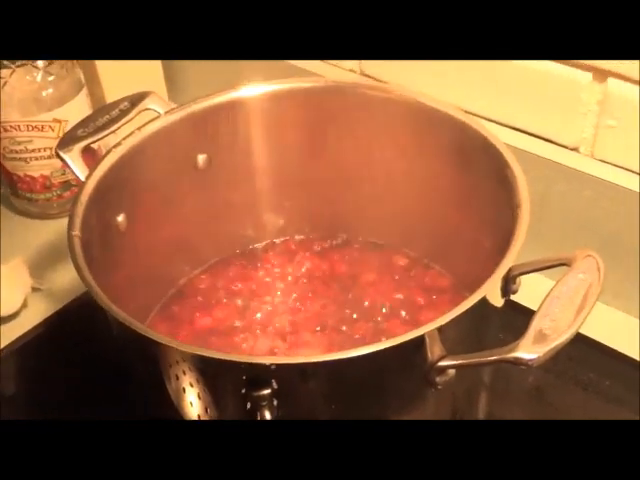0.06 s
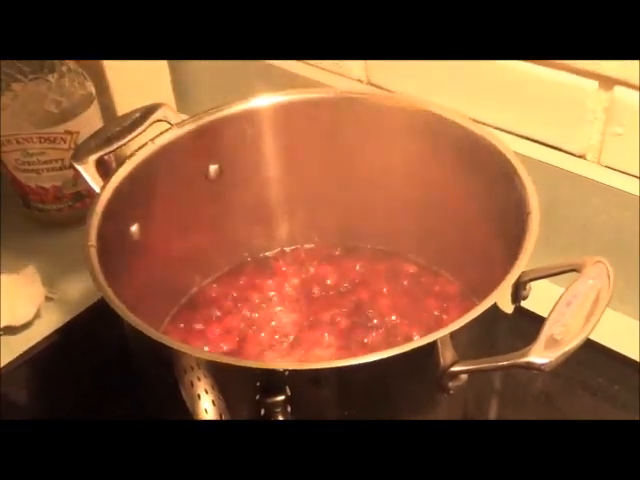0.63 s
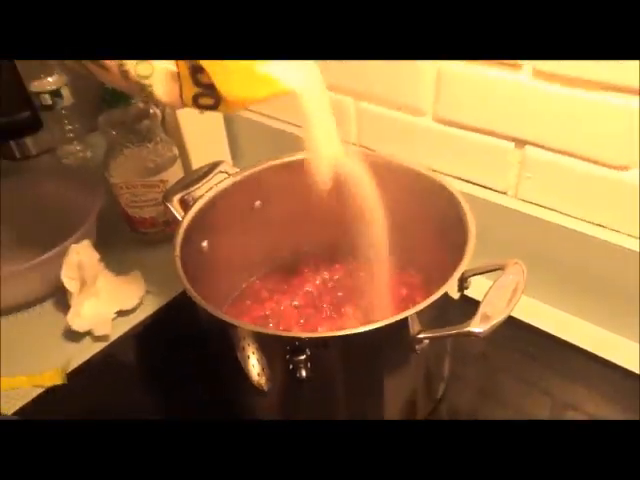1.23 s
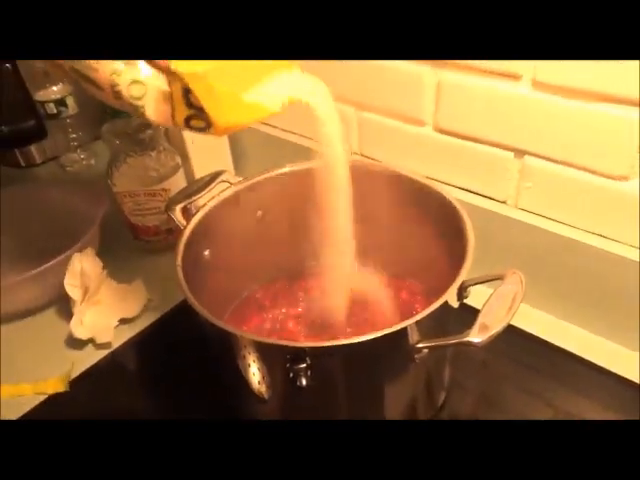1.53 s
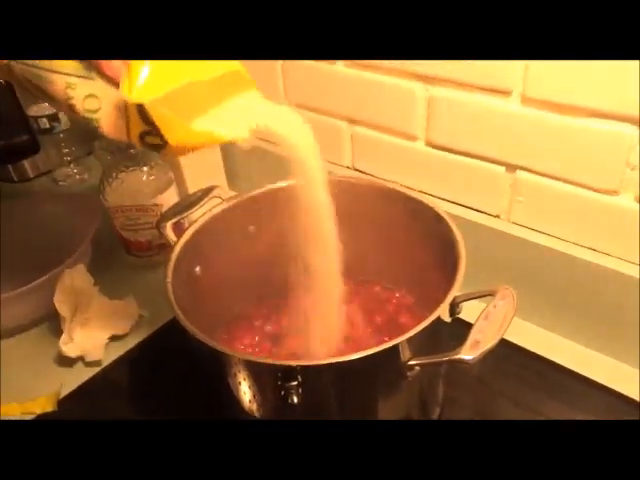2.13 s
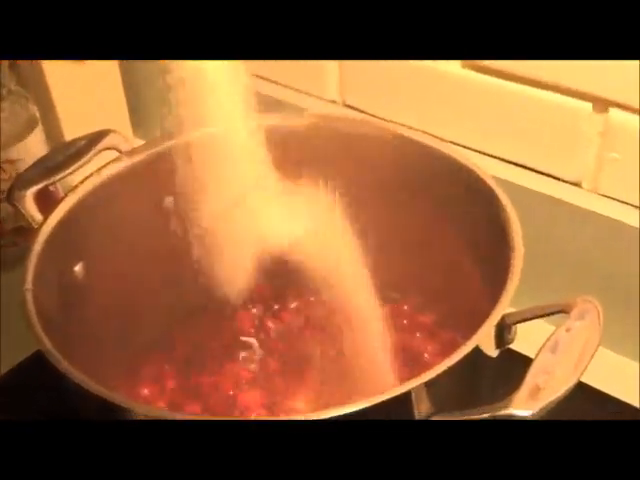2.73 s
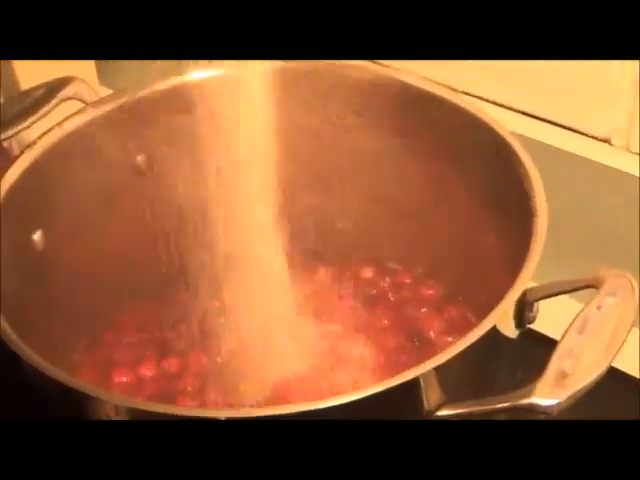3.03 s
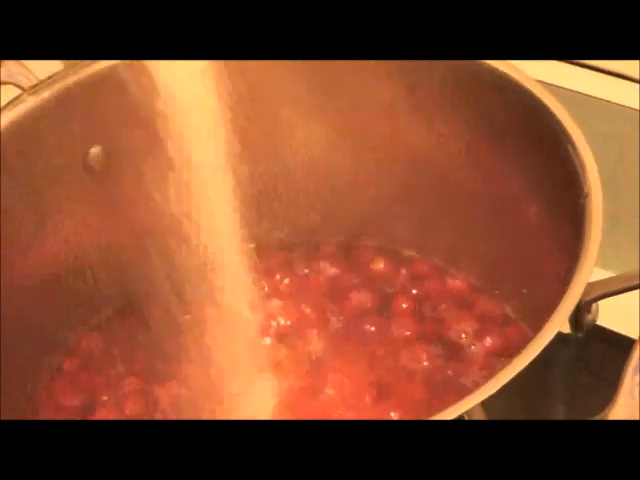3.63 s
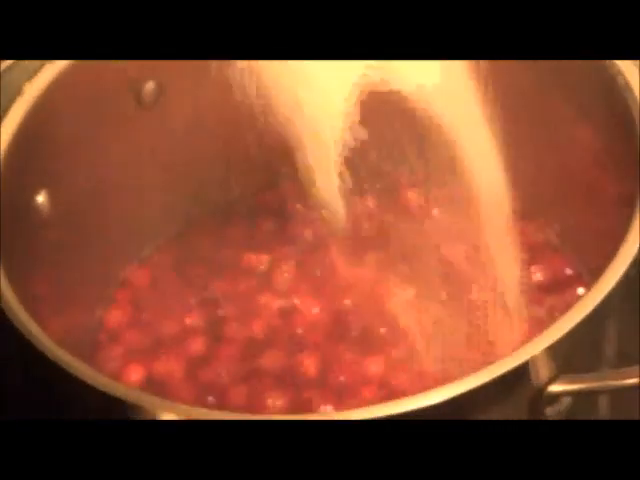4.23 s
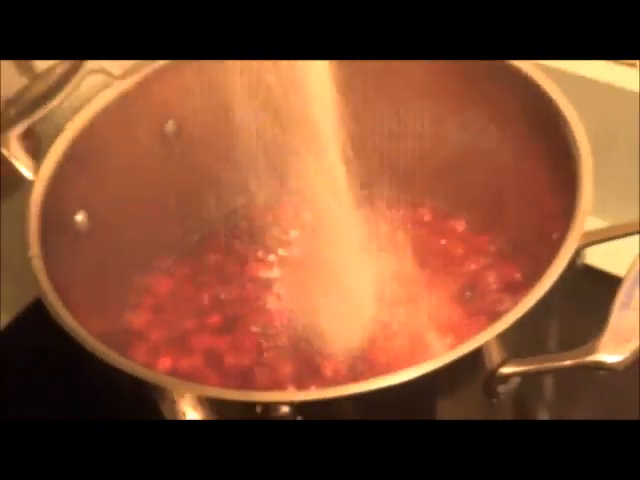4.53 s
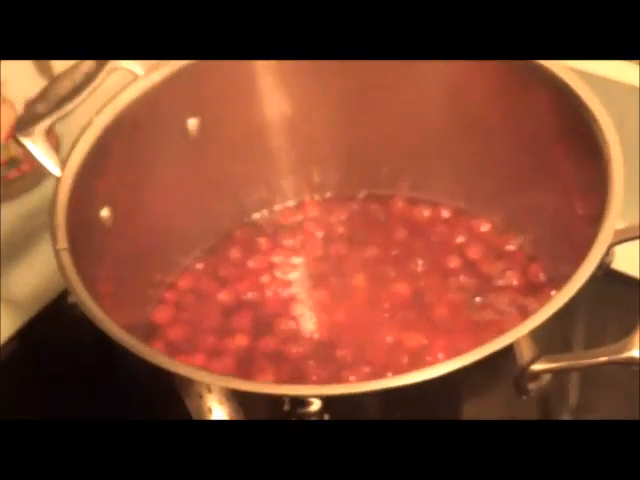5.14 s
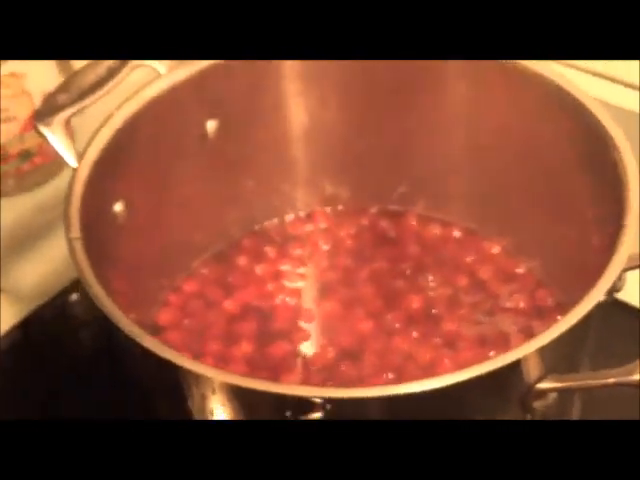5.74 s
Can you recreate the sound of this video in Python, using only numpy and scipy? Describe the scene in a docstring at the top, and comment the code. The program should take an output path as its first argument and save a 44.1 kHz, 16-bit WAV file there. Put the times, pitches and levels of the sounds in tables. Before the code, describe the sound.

A thin, bright hiss of sugar falls into a steel pot of softly simmering berry sauce, heard close in stereo with very little kitchen echo. In the first 0.6 seconds several berries pop sharply, with a couple of tiny ticks. From about 0.7 seconds the sugar comes in quick surges, around seven a second: fine crystals hiss, coarse grains patter, and each surge drops a clump that splashes, thuds softly and faintly clangs the pot. A hard lump ticks against the steel near 2 seconds. The pour grows and is strongest from about 3.3 to 4.7 seconds, with quiet bubbling and a light metallic ring underneath. The last clump lands near 4.9 seconds, and the stream thins to a smooth hiss with two small spills of grains, swelling slightly around 5.5 seconds. A few ticks follow at 5.7 to 5.8 seconds, then one last small pop.

```python
"""A thin hiss of sugar and a few berries popping, close over a steel pot of sauce in a small kitchen.
The sugar pours from a paper bag in surges, about seven a second: fine crystals hiss, coarse ones patter,
and each surge drops a clump that splashes, thuds softly and clangs the pot. Underneath, the berry sauce
simmers and the steel rings. The stream thins to a smooth hiss, ending on a few ticks and one last pop.
Stereo microphone, near enough that almost all the sound comes straight from the pot."""
import sys
import numpy as np
from scipy import signal
from scipy.fft import rfft, irfft, next_fast_len
from scipy.io import wavfile
from scipy.ndimage import uniform_filter1d

SR = 44100
rng = np.random.default_rng(int(sys.argv[2]) if len(sys.argv) > 2 else 0)


def store_pcm(level_fs):
    """Save levels as 16-bit WAV."""
    pcm = np.round(np.clip(level_fs, -1, 1) * 32767).astype(np.int16)
    wavfile.write(sys.argv[1], SR, np.atleast_2d(pcm).T)


N = 258867
T = np.arange(N) / SR

# the thin stream that never stops: t/s, level/dB
TRICKLE_LEVEL = [(0, -39), (.68, -35.5), (2, -36), (3, -34), (4.4, -35), (4.82, -62), (4.89, -38.5),
                 (5.0, -37), (5.75, -36.5), (5.83, -45)]
# loose sugar sliding out as the bag tips: peak t/s, level/dB, rise/s, fall/s
SUGAR_SLIDES = [(.17, -30, 0.29, 0.17), (0.533, -31.5, 0.12, 0.043), (5.17, -31.5, 0.14, .1),
                (5.48, -26.5, 0.28, 0.17)]
# each shake of the bag, a surge with a clump in it: landing t/s, surge/dB, surge lead/s, splash/dB, thud/dB
BAG_SHAKES = [(0.737, -34.5, 0.067, -34.5, -66), (.868, -30, 0.076, -34, -78),
              (0.979, -44, 0.061, -29.5, -70), (1.111, -34, 0.045, -43, -48.5),
              (1.229, -43, 0.058, -27, -44), (1.359, -36, 0.049, -29, -45), (1.493, -31.5, 0.073, -26, -47),
              (1.606, -38, 0.05, -26.5, -54), (1.735, -32.5, 0.031, -26.5, -53),
              (1.886, -32.5, 0.033, -28.5, -63), (2.03, -28, 0.044, -25.5, -41),
              (2.17, -31.5, 0.053, -27.5, -59), (2.311, -39, 0.065, -26, -51),
              (2.436, -31, 0.055, -30, -56), (2.567, -29.5, 0.057, -26, -62),
              (2.697, -31, 0.047, -24.5, -47), (2.835, -32.5, 0.053, -25.5, -50),
              (2.965, -34, 0.047, -26, -46), (3.097, -29, 0.056, -24, -52), (3.233, -29, 0.049, -24.5, -59),
              (3.37, -28, 0.043, -22, -47), (3.511, -26, 0.044, -26, -39),
              (3.654, -26.5, 0.047, -21.5, -41), (3.792, -30, 0.042, -22.5, -48),
              (3.937, -27.5, 0.042, -22, -57), (4.083, -27, 0.061, -22.5, -56),
              (4.215, -23.5, 0.069, -29, -60), (4.339, -25.5, 0.061, -21, -51),
              (4.473, -28.5, 0.064, -25, -53), (4.601, -30, 0.067, -20.5, -68),
              (4.723, -28, 0.07, -25.5, -63), (4.856, -39, 0.016, -26.5, -62)]
# how long loose sugar runs on after a clump: t/s, run-out/s
SURGE_RUN_OUT = [(.85, 0.13), (1.1, 0.14), (2.2, 0.14), (3.6, 0.093), (4.6, 0.08), (4.72, 0.057)]
# spills of coarser crumbs in the stream: t/s, level/dB, half length/s
CRUMB_SPILLS = [(4.18, -26, .018), (4.308, -19, .015), (4.683, -23, .014), (5.317, -18, 0.019),
                (5.563, -20, 0.034)]
# spectra of fine crystals, coarse grains and the spray of a bursting clump: f/Hz, level/dB
HISS_SPECTRUM = [(100, -65), (400, -32.5), (1000, -11.5), (2000, -12), (3200, -8), (5000, -5), (8000, -3),
                 (11000, 1.5), (13500, 2), (15500, -3.5)]
PATTER_SPECTRUM = [(100, -54), (400, -17), (1000, -3.5), (2000, -2), (4500, -2), (8000, 0), (15000, 0.5)]
SPRAY_SPECTRUM = [(100, -67), (400, -15), (1000, -8), (3200, -5), (5000, -4), (8000, 0), (11000, 2),
                  (13500, 7), (15500, 4)]
# weight of falling sugar against the full pour: t/s, level/dB
POUR_LOAD = [(0, -13), (.7, -13.5), (1.2, -6), (2.3, -0.5), (4.5, -4.5), (4.73, -5), (4.82, -4), (4.86, -1),
             (4.93, -3), (5.2, -7.5), (5.87, -7)]
# spectrum of small bubbles in the sauce: f/Hz, level/dB
SAUCE_SPECTRUM = [(30, -67), (70, -23), (150, -7), (230, -9.5), (400, -0.5), (800, -1.5), (1500, -2),
                  (3000, 1), (6000, -5), (15000, -10.5)]
# weaker resonances of the pot and the air in it: f/Hz, width/Hz, level/dB
POT_MODES = [(188, 16, -3), (307, 27, -5), (478.6, 44, 3), (678, 81, 4), (951, 64, 6.5), (1190, 20, 6.5),
             (1706, 36, 5.5), (2180, 55, -7.5)]
# the pot's low, middle, upper and high note: f/Hz, width/Hz
POT_NOTES = [(695, 43), (1395, 57), (2040, 180), (2685, 93)]
# how strongly the stream rings those notes: t/s, low/dB, middle/dB, upper/dB, high/dB
POT_NOTE_LEVELS = [(0, -59, -50.5, -58, -66), (.7, -63, -48.5, -52.5, -55), (1.35, -49, -42, -59, -50),
                   (2.4, -49.5, -46.5, -57, -51.5), (3.9, -45.5, -49, -73, -52.5),
                   (4.5, -48.5, -51, -60, -54), (4.85, -50.5, -50.5, -67, -54), (5.3, -55.5, -64, -52, -69),
                   (5.58, -58, -58, -49, -66), (5.75, -59, -57, -74, -67)]
# berries and bubbles popping:
# t/s, crack level/dB, crack low edge f/Hz, low note level/dB, f/Hz, high note level/dB, f/Hz, decay/s
BERRY_POPS = [(.027, -26, 900, -42, 1420, -25.5, 2020, 0.004),
              (0.1231, -27, 700, -19.5, 1120, -31, 1900, 0.0047),
              (0.135, -14.5, 900, -18, 1090, -24, 2100, 0.001),
              (0.1398, -17, 1010, -28, 995, -23, 2850, 0.0057),
              (0.23, -11.5, 1330, -20, 1337, -19, 2180, 0.0048),
              (0.4072, -20, 1400, -15, 1800, -19.5, 2520, 0.0033),
              (0.5617, -17, 2000, -21.5, 1530, -28, 4040, 0.0054),
              (5.8478, -27.5, 900, -28, 1190, -28, 2120, 0.0045)]
# spectrum of a tearing skin: f/Hz, level/dB
CRACK_SPECTRUM = [(60, -2), (700, 4), (1300, 8.5), (2300, 7), (3000, -1), (3900, 8.5), (4700, 1), (5600, 2),
                  (8000, 0), (10000, 2), (15000, -28)]
# hard lumps hitting steel: t/s, level/dB, decay/s
LUMP_TICKS = [(0.178, -21, .001), (0.448, -15, 0.00043), (1.9715, -11.5, 0.0066), (2.0675, -26, .0015),
              (5.704, -30, .0015), (5.7504, -21, 0.004), (5.762, -23.5, 0.0022), (5.797, -25.5, 0.0034)]
# a clump's splash, mostly sharper as the bag empties: t/s, half length/s
SPLASH_LENGTH = [(1, 0.014), (2.5, 0.0078), (3.7, 0.005), (4.4, 0.0024), (4.86, 0.0073)]
# spectrum of a clump entering the sauce: f/Hz, level/dB
THUD_SPECTRUM = [(40, -52), (90, -20), (130, -5), (180, 2.5), (260, -1.5), (450, 6), (700, -6), (2000, -40),
                 (8000, -69)]
# the clanged high note, its pitch shifting with where the clump lands: t/s, level/dB, f/Hz
CLANG_NOTE = [(.74, -54, 2654), (1.6, -48, 2640), (2.3, -47, 2703), (2.95, -47, 2695), (3.5, -51, 2767),
              (4.34, -45, 2730), (4.474, -42, 2680), (4.603, -41.5, 2626), (4.722, -43.5, 2660),
              (4.855, -42.5, 2680)]
# likeness of left and right at the microphone: f/Hz, correlation (0-1)
STEREO_LIKENESS = [(100, .97), (500, .92), (1000, .88), (2200, .74), (4000, .8), (8000, .85), (13000, .9)]
# balance at the microphone: t/s, left over right/dB
BALANCE_DRIFT = [(0, 1), (1, -0.5), (3.2, 0.2), (4.5, 0), (5.6, 1)]


def amp(db):
    """Decibels to gain."""
    return 10 ** (np.asarray(db) / 20)


def unit(x):
    """Scales to rms 1."""
    return x / np.sqrt(np.mean(x ** 2) + 1e-20)


def along(points, hz):
    """Reads a spectrum on a log-frequency axis."""
    f, value = np.transpose(points)
    return np.interp(np.log(hz + 1), np.log(f), value)


def level(curve):
    """A dB curve as a gain for every sample."""
    return amp(np.interp(T, *np.transpose(curve)))


def bell(s, half_s):
    """A smooth hump of height 1 around time s."""
    return np.exp(-np.minimum(((T - s) / half_s) ** 2, 20))


def add(mix, s, sound):
    """Mixes a sound in at time s."""
    part = mix[:, round(s * SR):][:, :sound.shape[1]]
    part += sound[:, :part.shape[1]]


def response(points, size=2048):
    """Causal impulse response of energy 1 with the given spectrum."""
    log_gain = np.log(amp(along(points, abs(np.fft.fftfreq(size, 1 / SR)))))
    h = np.fft.ifft(np.exp(signal.hilbert(log_gain).conj())).real
    h = h if np.sum(h[:size // 2] ** 2) > np.sum(h[size // 2:] ** 2) else np.roll(h[::-1], 1)
    return h / np.linalg.norm(h)


def through(x, h):
    """Convolves each channel with a response."""
    return signal.oaconvolve(np.atleast_2d(x), np.atleast_2d(h), axes=1)[:, :N]


def impacts(per_s, spread_db):
    """Two trains of random impacts of uneven size, rms 1."""
    size = amp(spread_db * np.minimum(rng.exponential(1, (2, N)), 4))
    return unit(size * rng.choice([-1, 1], (2, N)) * (rng.random((2, N)) < per_s / SR))


def flutter(rate_hz, depth_db):
    """A gain that wanders at random, mostly slower than the given rate."""
    hz = np.fft.rfftfreq(N, 1 / SR)
    wander = irfft(rfft(rng.standard_normal(N)) / (1 + (hz / rate_hz) ** 2), N)
    return amp(depth_db * unit(wander))


def flow(pinch_db=-4, pinch_ahead_s=.00067, pinch_half_s=.015):
    """Strength of the stream: trickle, slides and surges add in power; surges peak behind their front."""
    power, pinch = level(TRICKLE_LEVEL) ** 2, np.zeros(N)
    for s, db, rise, fall in SUGAR_SLIDES:
        power += (amp(db) * bell(s, np.where(T < s, rise, fall))) ** 2
    for s, db, lead, _, _ in BAG_SHAKES:
        age = np.clip(T - s + lead, 0, .5)
        front = 1 - np.exp(-age / .014) * np.cos(np.pi * age / .045)
        length = lead + np.interp(s, *np.transpose(SURGE_RUN_OUT))
        power += (amp(db) * front * np.exp(-(age / length) ** 2)) ** 2
        # the bag swings back and pinches the stream just before the surge
        pinch += bell(s - lead - pinch_ahead_s, pinch_half_s)
    return np.sqrt(power) * amp(pinch_db * pinch)


def coarse_flow(strength, front_db=3, front_s=.049):
    """Coarse grains follow the stream, crowd the front of each surge and come in small spills."""
    power = strength ** 2 + sum((amp(db) * bell(s, half)) ** 2 for s, db, half in CRUMB_SPILLS)
    for s, db, lead, _, _ in BAG_SHAKES:
        age = np.clip((T - s + lead) / front_s, 0, 6)
        power += (amp(db + front_db) * age * np.exp(1 - age ** 2)) ** 2
    return np.sqrt(power)


def sugar(strength):
    """Countless fine crystals hiss, brightest when a clump bursts; coarse ones patter and sound the pot."""
    fine = impacts(per_s=15000, spread_db=1.9) * flutter(rate_hz=60, depth_db=.7) * strength
    coarse = impacts(per_s=2200, spread_db=1.5) * flutter(rate_hz=9.7, depth_db=2.33)
    coarse *= coarse_flow(strength)
    burst = impacts(per_s=12000, spread_db=1.5) * np.sqrt(splash_power())
    fine = wandering_echoes(fine, near_db=-15, near_s=.0012, late_db=-12, late_s=.004)
    bounced = wandering_echoes(coarse, near_db=-1, near_s=.001, late_db=-14, late_s=.005)
    hiss = amp(1) * through(fine, response(HISS_SPECTRUM))
    spray = amp(2.5) * through(burst, response(SPRAY_SPECTRUM))
    patter = amp(-11) * through(bounced, response(PATTER_SPECTRUM))
    return hiss + spray + patter + amp(-34.5) * pot_body(coarse)


def wall_echoes(x, near_db, near_s, late_db, late_s):
    """A short sound bounces across the pot for a few milliseconds, then lingers faintly."""
    t = T[:SR // 12]
    taps = np.zeros((2, len(t)))
    for db, decay in (near_db, near_s), (late_db, late_s):
        echoes = rng.standard_normal(taps.shape) * (t / decay) * np.exp(-t / decay)
        taps += amp(db) * echoes / np.linalg.norm(echoes, axis=1, keepdims=True)
    taps[:, 0] += 1  # direct path to the microphone
    return signal.fftconvolve(x, taps, axes=1)


def wandering_echoes(x, wander_s=.08, **walls):
    """The stream wanders over the sauce; each spot has its own wall echoes, so the colour shifts."""
    hop = round(wander_s * SR)
    padded, out = np.pad(x, ((0, 0), (hop, 2 * hop))), np.zeros((2, N + 3 * hop))
    crossfade = np.hanning(2 * hop)
    for start in range(0, N + hop, hop):
        echoes = wall_echoes(np.ones((2, 1)), **walls)
        spot = padded[:, start:start + 2 * hop] * crossfade
        add(out, start / SR, signal.fftconvolve(spot, echoes, axes=1))
    return out[:, hop:hop + N]


def pot_body(x):
    """The weaker resonances of the pot ring when x strikes it."""
    t = T[:SR // 8]
    ring = sum(amp(db) * 2 * np.pi * width / SR * np.exp(-np.pi * width * t) * np.cos(2 * np.pi * hz * t)
               for hz, width, db in POT_MODES)
    return through(x, ring / np.linalg.norm(ring))


def pot_notes(strength):
    """Impacts keep four notes of the pot ringing; they swell with each surge and clump."""
    drive = np.sqrt(strength ** 2 + splash_power())
    swell = (drive / uniform_filter1d(drive, SR // 4)) ** .49
    t, out = T[:SR // 8], np.zeros((2, N))
    times, *levels = np.transpose(POT_NOTE_LEVELS)
    for (hz, width), db in zip(POT_NOTES, levels):
        ring = np.exp(-np.pi * width * t) * np.cos(2 * np.pi * hz * t)
        blows = impacts(per_s=2500, spread_db=1) * swell * flutter(rate_hz=40, depth_db=1.3)
        out += amp(np.interp(T, times, db)) * unit(through(blows, ring))
    return out


def sauce(churn_db=-36, load_exponent=.57, blanket_db=-7.5):
    """Small bubbles burst and sound the pot; the pour churns them up, a blanket of sugar calms them."""
    load = level(POUR_LOAD)
    poured = np.cumsum(load ** 2)
    churn = load ** load_exponent * amp(churn_db + blanket_db * np.sqrt(poured / poured[-1]))
    bursts = impacts(per_s=2500, spread_db=1) * churn * flutter(rate_hz=22, depth_db=2)
    return amp(-3.5) * through(bursts, response(SAUCE_SPECTRUM)) + amp(-7.5) * pot_body(bursts)


def berry_pops(snap_db=1, pitch_rise_per_s=8):
    """A skin snaps and tears; the pocket under it rings briefly with two notes that rise as it opens."""
    t, out = T[:SR // 40], np.zeros((2, N))
    colour = response(CRACK_SPECTRUM)
    turn = 2j * np.pi * t * (1 + pitch_rise_per_s * t / 2)
    bass_cut = signal.butter(1, 400, "high", fs=SR, output="sos")  # a small pocket radiates little bass
    for s, crack_db, edge_hz, low_db, low_hz, high_db, high_hz, decay in BERRY_POPS:
        fade = np.exp(-(t / decay) ** 1.64)
        split = rng.choice([-1, 1], (2, len(t))) * fade
        split[0, 0] = amp(snap_db)  # first break of the skin
        tear = signal.fftconvolve(split, colour[None], axes=1)[:, :len(t)]
        crack = signal.sosfilt(signal.butter(2, edge_hz, "high", fs=SR, output="sos"), tear)
        ring = fade * (amp(low_db) * np.exp(low_hz * turn) - amp(high_db) * np.exp(high_hz * turn))
        pop = amp(crack_db) * crack + signal.sosfilt(bass_cut, [ring.imag, ring.real])
        add(out, s, wall_echoes(pop, near_db=-13, near_s=.0016, late_db=-18, late_s=.009))
    return out


def kitchen(x, t60):
    """A short tail off tiles and worktop reaches the microphone 5 ms behind the direct sound."""
    t = T[:SR // 3]
    tail = rng.standard_normal((2, len(t))) * amp(-60 * t / t60) * (t > .005)
    return through(x[0], tail / np.linalg.norm(tail, axis=1, keepdims=True))


def lump_ticks():
    """Hard lumps shatter on the steel in a brief spray of crystals."""
    spray = sum(amp(db) * (T >= s) * np.exp(-np.clip((T - s) / decay, 0, 20))
                for s, db, decay in LUMP_TICKS)
    return through(spray * rng.choice([-1, 1], (2, N)), response(SPRAY_SPECTRUM))


def splash_power():
    """Each clump bursts as it lands: a brief hump of power."""
    return sum(amp(db) ** 2 * bell(s, np.interp(s, *np.transpose(SPLASH_LENGTH)))
               for s, _, _, db, _ in BAG_SHAKES)


def clump_clangs(clang_decay_s=.062, boom_db=-19.5, boom_decay_s=.028):
    """Each clump rings the pot with a high note and a short low boom; both waver as the sauce sloshes."""
    t, out = T[:SR // 3], np.zeros((2, N))
    times, dbs, pitches = np.transpose(CLANG_NOTE)
    for s, _, _, splash_db, _ in BAG_SHAKES:
        high_db, high_hz = np.interp(s, times, dbs), np.interp(s, times, pitches)
        low_hz = POT_NOTES[0][0] * rng.uniform(.97, 1.03)
        high = amp(high_db) * np.sin(2 * np.pi * high_hz * t) * np.exp(-t / clang_decay_s)
        low = amp(splash_db + boom_db) * np.sin(2 * np.pi * low_hz * t) * np.exp(-t / boom_decay_s)
        add(out, s, np.array([high + low, high + low]))
    return out * flutter(rate_hz=30, depth_db=2)


def clump_thuds():
    """Each clump pushes into the sauce: one dull blow, then a puff as it sinks."""
    t, out = T[:SR // 12], np.zeros((2, N))
    for s, *_, db in BAG_SHAKES:
        push = amp(-1) * rng.standard_normal((2, len(t))) * (t / .0053) * np.exp(1 - t / .0043)
        push[0, 0] += amp(24.5)  # the blow
        add(out, s, amp(db) * push)
    return through(out, response(THUD_SPECTRUM))


def stereo_image(x):
    """Takes two signals as mid and side, giving a mostly alike left and right."""
    size = next_fast_len(N)
    same = np.clip(along(STEREO_LIKENESS, np.fft.rfftfreq(size, 1 / SR)), 0, 1)
    weights = np.sqrt([(1 + same) / 2, (1 - same) / 2])
    mid, side = irfft(rfft(x, size) * weights, size)[:, :N]
    return np.array([mid + side, mid - side])


def scene():
    """Close on the pot, the image drifting a little; only the pops carry into the kitchen."""
    strength, pops = flow(), berry_pops()
    inside = sugar(strength) + pot_notes(strength) + clump_clangs() + clump_thuds()
    inside += sauce() + lump_ticks() + pops
    room = amp(-8.5) * kitchen(pops, t60=.11)
    balance = np.sqrt(level(BALANCE_DRIFT))
    return stereo_image(inside + room) * [balance, 1 / balance]


def record(dry):
    """The recorder cuts the very top of the treble."""
    edge_hz = 15520
    lowpass = signal.firwin(511, edge_hz, window=("kaiser", 9), fs=SR)
    return signal.oaconvolve(dry, lowpass[None], "same")


dry = scene()
out = record(dry)
store_pcm(out)
```